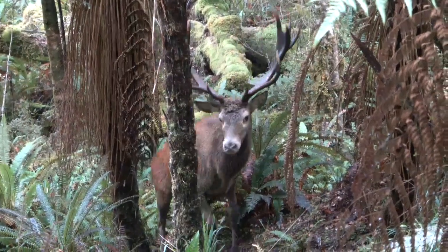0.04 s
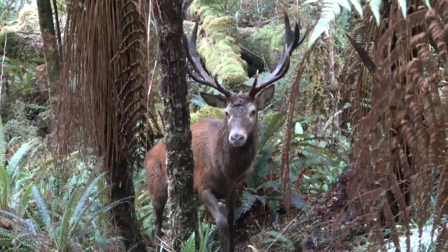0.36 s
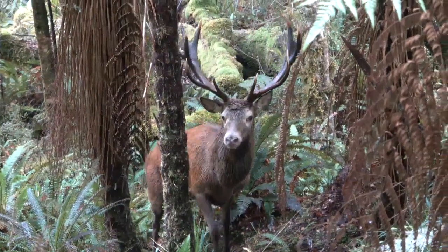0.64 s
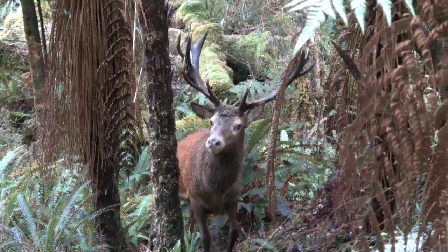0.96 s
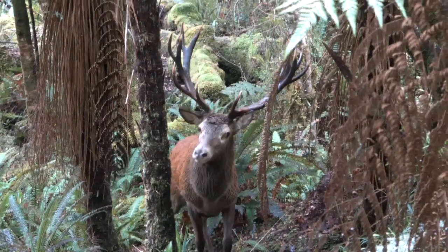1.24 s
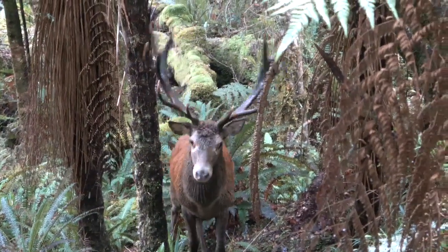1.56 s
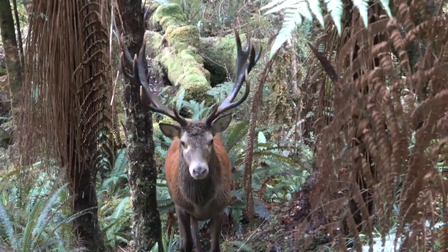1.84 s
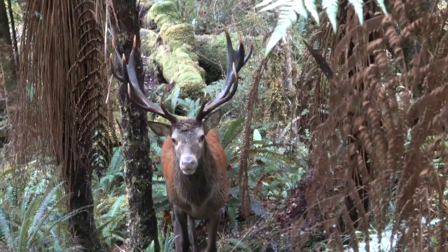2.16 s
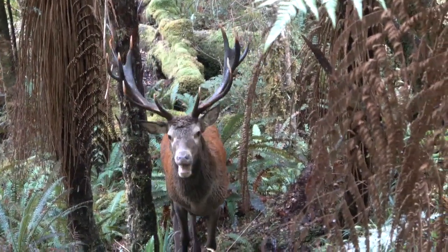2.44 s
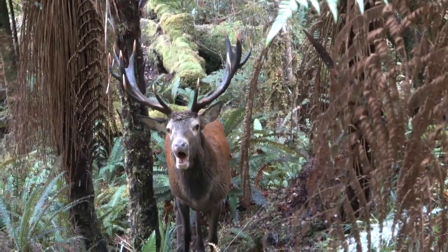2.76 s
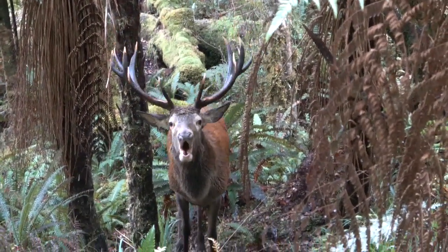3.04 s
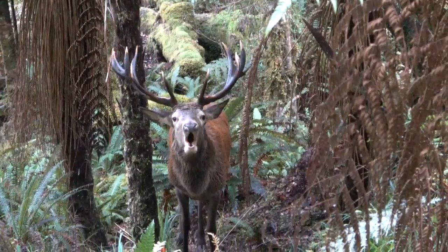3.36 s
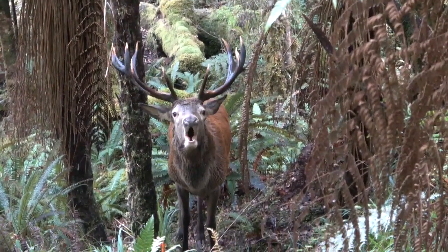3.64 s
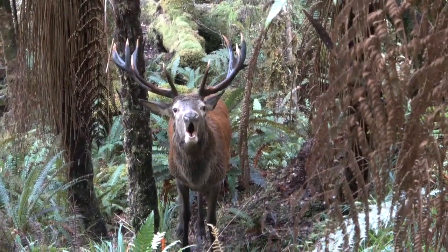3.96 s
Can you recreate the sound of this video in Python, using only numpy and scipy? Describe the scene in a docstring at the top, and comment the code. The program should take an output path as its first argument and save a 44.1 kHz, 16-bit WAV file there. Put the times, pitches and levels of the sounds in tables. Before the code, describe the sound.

A stag gives one loud roar close by, starting as a pulsing growl, holding a hooting note, then breaking lower and rasping. Before it come only faint fern ticks and a brief snort over soft forest hush.

```python
"""A red deer stag roars once, a few metres away in a quiet forest.
Slow pulses of its vocal folds speed up while the throat stretches and its resonances sink.
It holds a loud hoot, one harmonic on a resonance, then breaks to a lower pitch and turns harsh.
Faint fern rustles and a snort, all short puffs of noise, lead in. Nearby trunks reflect
these sounds and the roar, over a soft forest hush that swells toward the end."""
import sys
import numpy as np
from scipy import signal
from scipy.fft import rfft, irfft
from scipy.io import wavfile

SR = 44100
rng = np.random.default_rng(int(sys.argv[2]) if len(sys.argv) > 2 else 0)


def to_wav(s):
    """Save 16-bit WAV."""
    ch = np.atleast_2d(s).T  # columns
    pcm = np.round(np.clip(ch, -1, 1) * 32767)  # PCM
    wavfile.write(sys.argv[1], SR, pcm.astype(np.int16))


N = 176400

# level rides on the roar's three bands (time [s], level [dB])
BASS_LEVEL = [(2.39, -62), (2.456, -52.5), (2.572, -40.5), (2.622, -32), (2.874, -19.5), (2.886, -22),
              (2.964, -13), (3.012, -24.5), (3.116, -18.5), (3.142, -28.5), (3.164, -16), (3.232, -12),
              (3.282, -17), (3.322, -10), (3.372, -9), (3.456, -9), (3.484, -18.5), (3.572, -23),
              (3.802, -22), (3.928, -12), (3.946, -18.5), (4.0, -20.5)]
MIDDLE_LEVEL = [(2.39, -56), (2.474, -44), (2.608, -41.5), (2.618, -29), (2.7, -27.5), (2.8, -24.5),
                (2.886, -21.5), (2.94, -19.5), (3.0, -19), (3.06, -21), (3.125, -28.5), (3.165, -20.5),
                (3.21, -25.5), (3.27, -30), (3.31, -22), (3.35, -30), (3.43, -22.5), (3.466, -29),
                (3.5, -24), (3.62, -21), (3.72, -23), (3.83, -21), (3.93, -23.5), (4, -23.5)]
TREBLE_LEVEL = [(2.39, -67), (2.402, -50.5), (2.586, -46.5), (2.68, -39.5), (2.78, -43), (2.846, -30.5),
                (2.922, -25), (2.964, -31), (3.048, -29.5), (3.124, -39.5), (3.164, -33), (3.286, -47),
                (3.618, -41.5), (3.792, -45.5), (3.842, -38), (4.0, -39.5)]
# stereo lean of the roar (frequency [Hz], left minus right [dB])
ROAR_PAN = [(60, 6), (130, -3), (260, -2.0), (550, -1.5), (1150, -3.5), (2410, -1.5), (5050, 0),
            (10600, 4.5)]


def roar(size=2205):
    """The stag's voice among the trees, each band levelled and then ridden by its own envelope."""
    t, voice, out = np.arange(N) / SR, forest(vocal_folds()), np.zeros((2, N))
    padded = np.pad(voice, ((0, 0), (0, SR // 2)))
    below = lambda hz, edge_hz: 1 / (1 + (hz / edge_hz) ** 16)
    bass = lambda hz: below(hz, 700)
    middle = lambda hz: below(hz, 2800) - below(hz, 700)
    treble = lambda hz: 1 - below(hz, 2800)
    window = np.hanning(size) / np.hanning(size).sum()
    opening = (t > GROWL_RATE[1][0]) & (t < GROWL_RATE[4][0])
    for band, level in ((bass, BASS_LEVEL), (middle, MIDDLE_LEVEL), (treble, TREBLE_LEVEL)):
        part = filtered(padded, band)[:, :N]
        squared = np.pad(part.mean(0) ** 2, size, "reflect")
        power = signal.fftconvolve(squared, window, "same")[size:-size]
        floor = .5 * np.mean(power[opening])  # keeps the silence before the growl down
        out += part * amp(curve(level, t)) / np.sqrt(np.maximum(power, floor))
    return filtered(out, lambda hz: amp(np.outer([.5, -.5], spectrum(ROAR_PAN, hz))))


# the opening growl speeds up (time [s], pulse rate [Hz])
GROWL_RATE = [(2.4, 15), (2.434, 44), (2.45, 49), (2.49, 51), (2.55, 45.5), (2.6, 53), (2.65, 62),
              (2.695, 72), (2.747, 80), (2.795, 87), (2.848, 103), (2.892, 121.8), (2.914, 127.8),
              (2.954, 132.6), (2.994, 147)]
# the held note and its downward break (time [s], pitch [Hz])
HELD_PITCH = [(3.02, 149.9), (3.096, 159.4), (3.202, 161.7), (3.262, 159.1), (3.3, 161.8), (3.402, 164.5),
              (3.448, 161), (3.458, 160.8), (3.492, 139), (3.598, 134.3), (3.666, 136.3), (3.78, 135),
              (3.802, 134.7), (3.944, 118.4), (3.974, 115.4), (4.0, 109.8)]
# rasp in the voice (time [s], noise against pulse at RASP_HZ [ratio])
RASP = [(2.4, 0.15), (2.8, 0.45), (2.92, 0.63), (3.02, 0.65), (3.14, 0.25), (3.42, 0.21), (3.48, 0.81),
        (3.56, 0.23), (3.8, 0.18), (3.87, 0.46), (3.95, 1), (4, 1)]
RASP_HZ, RASP_SLOPE = 2040, 0.92
JITTER, SHIMMER_DB = 0.0054, 2.5  # scatter of pulse timing and strength at full rasp
WANDER, WANDER_HZ = .002, 26  # relative pitch drift and its bandwidth
FLUTTER_DB, FLUTTER_HZ = 2.48, (1.968, 8)  # each resonance wavers in strength


def vocal_folds(size=4096):
    """Each closure of the vocal folds, with a puff of noise, rings the throat."""
    t, hz, out = np.arange(N) / SR, np.fft.rfftfreq(size, 1 / SR), np.zeros(N)
    drift = unit_rms(filtered(rng.standard_normal(N), lambda f: np.exp(-(f / WANDER_HZ) ** 2)))
    pitch = curve(GROWL_RATE + HELD_PITCH, t) * (1 + WANDER * drift)
    cycles = np.cumsum(pitch * (t >= GROWL_RATE[0][0])) / SR
    flutter_rate, flutter_phase = rng.uniform(*FLUTTER_HZ, len(FORMANTS)), rng.random(len(FORMANTS))
    for i in np.flatnonzero(np.diff(np.ceil(cycles))):
        s, rasp = t[i], curve(RASP, t[i])
        late, strong = rng.standard_normal(2)
        puff = rng.standard_normal(size) * np.exp(-t[:size] / 0.0072)
        noise_gain = rasp * (hz / RASP_HZ) ** RASP_SLOPE
        source = 1 + noise_gain * rfft(puff / np.linalg.norm(puff))
        flutter_db = FLUTTER_DB * np.sin(2 * np.pi * (flutter_rate * s + flutter_phase))
        colour = minimum_phase(throat(s, hz, flutter_db) / np.sqrt(1 + noise_gain ** 2))
        onset = s + JITTER * rasp * late / max(pitch[i], 100)
        add(out, onset, -amp(SHIMMER_DB * rasp * strong) * irfft(source * colour))
    return out


# throat resonances (at rest [Hz], half stretched [Hz], fully stretched [Hz], width [Hz],
# growl gain [dB], hoot gain [dB], bellow gain [dB])
FORMANTS = [(293, 205, 177.7, 31, -2.5, -7, -8), (335, 390, 252, 22, -27, -1, -16),
            (402, 448, 377, 40.6, 4, 0.5, 3.5), (921, 578, 480.7, 38, 4.5, 1, 13),
            (880, 816, 810, 26, -13, 3, 11.5), (1164, 1017, 910, 56, -1, -7.5, -13),
            (1260, 1150, 1143, 41.6, -14, 1.5, 1.5), (1460, 1374, 1263, 53.5, 1.5, -18, -17.5),
            (1500, 1700, 1453, 126, -11.5, -13, -12), (1815, 1850, 1915, 36.3, -1, 3.5, -13),
            (2280, 1977, 2240, 140, -6.5, -17, -13), (2700, 2740, 2490, 150, -18, -22.5, -21.5),
            (3240, 3220, 3330, 62, -18.5, -22.5, -1.5), (3950, 3984, 3760, 103, -15.5, -19.5, -21),
            (4070, 4810, 3480, 200, -15.5, -27, -30), (5520, 6400, 5260, 250, -36.5, -31, -20),
            (6450, 4900, 6220, 80, -27, -23, -38.5), (8000, 6900, 7220, 940, -36.5, -44, -29),
            (9550, 10200, 8740, 900, -46.5, -50, -63)]
# hollows between the resonances (at rest [Hz], fully stretched [Hz], width [Hz], depth [dB])
NOTCHES = [(1570, 1696, 104, 8), (3050, 1000, 68, 2), (5270, 4760, 106, 29), (6100, 5760, 72, 18)]
# the throat lengthens (time [s], stretch [0 at rest, 1 full])
THROAT_STRETCH = [(2.5, 0.29), (2.58, 0.089), (2.62, 0.26), (2.7, 0.43), (2.8, .54), (2.9, 0.67),
                  (2.96, 0.86), (3.12, 0.92)]
# morph between the formant gains (time [s], voice [0 growl, 1 hoot, 2 bellow])
VOICE_MORPH = [(2.85, 0), (2.96, 0.23), (3.02, 0.12), (3.13, 0.73), (3.45, 1), (3.5, 1.42)]
# the resonance that lifts one harmonic into a hoot (time [s], boost at full morph [dB])
HOOT_BOOST = [(3.05, 6.5), (3.13, -6), (3.2, 10), (3.28, 5), (3.33, 9.5), (3.39, 14), (3.45, 13.5),
              (3.485, 14.5), (3.55, 5), (3.85, 3), (3.92, 4.5), (3.96, 1.5)]
HOOT_HZ, HOOT_WIDTH_HZ = 486.3, 39
VALLEY_DB, LOW_CUT_HZ = -66.5, 112


def throat(s, hz, flutter_db):
    """Gain of the throat at time s: stretching slides its resonances, most of them downward."""
    stretch, morph = curve(THROAT_STRETCH, s), curve(VOICE_MORPH, s)
    power = amp(VALLEY_DB) ** 2
    for (rest, half, full, width, *gains_db), sway_db in zip(FORMANTS, flutter_db):
        centre = np.interp(stretch, [0, .5, 1], [rest, half, full])
        peak = amp(np.interp(morph, [0, 1, 2], gains_db) + sway_db)
        power = power + peak ** 2 / (1 + ((hz - centre) / width) ** 2) ** 2
    bump = lambda centre, width: np.exp(-((hz - centre) / width) ** 2)
    notch_db = sum(depth * bump(rest + stretch * (full - rest), width)
                   for rest, full, width, depth in NOTCHES)
    hoot = bump(HOOT_HZ, HOOT_WIDTH_HZ)
    neighbours = bump(HOOT_HZ, 220) - hoot  # harmonics beside the hoot duck as it rises
    hoot_db = curve(HOOT_BOOST, s) * np.clip(morph, 0, 1) * (hoot - .9 * neighbours)
    low_cut = (hz ** 2 + 100) / (hz ** 2 + LOW_CUT_HZ ** 2)
    return np.sqrt(power) * amp(hoot_db - notch_db) * low_cut


# tone of the snort (frequency [Hz], relative level [dB])
SNORT_EQ = [(88, -54), (150, -34), (418, -0.5), (873, -1), (1320, -12), (1960, -8), (2430, -29),
            (2610, -15), (4240, -27), (6650, -24), (11000, -42), (14300, -76), (22000, -120)]


def snort(start_s=2.308, level_db=-40, length_s=.022):
    """One short puff of breath just before the roar."""
    out = np.zeros(N)
    add(out, start_s, amp(level_db) * burst(length_s, lambda hz: amp(spectrum(SNORT_EQ, hz))))
    return out


# fern rustles and twig ticks (time [s], level [dB], length [s], centre [Hz], width [octaves])
FERN_HITS = [(0.478, -62.5, .05, 4500, 0.89), (0.714, -66, .008, 7000, .6), (.887, -52, 0.005, 6270, 0.33),
             (1.44, -65.5, 0.027, 7000, .4), (2.031, -64, 0.0092, 8400, 0.18),
             (2.14, -53.5, 0.012, 1100, 0.85)]


def ferns():
    """Ferns and twigs brush as the stag steps forward."""
    out = np.zeros(N)
    for s, db, length, centre_hz, octaves in FERN_HITS:
        band = lambda hz: np.exp(-.5 * (np.log2((hz + 1) / centre_hz) / octaves) ** 2)
        add(out, s, amp(db) * burst(length, band))
    return out


# reverb tail of the forest (frequency [Hz], time to fall 60 dB [s])
FOREST_DECAY = [(150, 0.31), (600, 0.98), (2000, 1), (8000, 0.75)]
TAIL_DB, TRUNKS_DB = -16.5, -7


def forest(x):
    """Adds quick reflections from nearby trunks and a faint tail, different at each ear."""
    t = np.arange(SR // 2) / SR
    hz, frame_s, frames = signal.stft(rng.standard_normal((2, len(t))), SR, nperseg=256)
    decay = amp(-60 * frame_s / spectrum(FOREST_DECAY, hz)[:, None])
    tail = signal.istft(frames * decay, SR)[1][:, :len(t)]
    scatter = rng.standard_normal((3, len(t))) * np.exp(-t / .006) * (t > .002)  # left, right, shared
    # near reflections are kept to the treble, so the low harmonics stay clear and steady
    highpass = signal.butter(2, 2200, "high", fs=SR, output="sos")
    trunks = signal.sosfilt(highpass, scatter[:2] * 0.75 + scatter[2])
    echo = amp(TAIL_DB) * tail / np.linalg.norm(tail[0])
    echo += amp(TRUNKS_DB) * trunks / np.linalg.norm(trunks[0])
    return x + signal.fftconvolve(x[None], echo, axes=1)[:, :N]


# tone of the forest bed (frequency [Hz], relative level [dB])
HUSH_EQ = [(12, -46), (20, -16), (71, -9), (137, -12), (189, -5), (259, -11), (375, -2), (587, -4),
           (688, 0), (1110, -11), (1330, -12), (6660, -27), (11000, -33), (14300, -63), (22000, -120)]
# its slow swell (time [s], level [dB])
HUSH_SWELL = [(0, -51), (.6, -51.5), (1.3, -52.5), (2, -52.5), (4, -41.5)]
# its stereo image (frequency [Hz], likeness of left and right [0-1])
HUSH_COHERENCE = [(60, 0.54), (170, 0.8), (470, 0.9), (1330, 0.92), (3750, 0.85), (10600, 0.57)]


def hush():
    """Distant wash of the forest, swaying a little and rising under the roar."""
    shared, separate = rng.standard_normal((2, N))
    likeness = lambda hz: spectrum(HUSH_COHERENCE, hz)
    right = filtered(shared, likeness) + filtered(separate, lambda hz: np.sqrt(1 - likeness(hz) ** 2))
    bed = unit_rms(filtered(np.array([shared, right]), lambda hz: amp(spectrum(HUSH_EQ, hz))))
    t = np.arange(N) / SR
    sway = sum(np.sin(2 * np.pi * (hz * t + rng.random())) for hz in np.geomspace(1, 14, num=16))
    return bed * amp(curve(HUSH_SWELL, t) + 0.45 * unit_rms(sway))


def burst(length_s, colour, size=8192):
    """A puff of coloured noise: quick rise, hold, quick fall."""
    t = np.arange(size) / SR
    envelope = np.minimum(t / 0.00067, 1) * np.exp(-(t / length_s) ** 3)
    return unit_rms(filtered(rng.standard_normal(size), colour)) * envelope


def amp(db):
    """Decibels to gain."""
    return 10 ** (np.asarray(db) / 20)


def unit_rms(x):
    """Scales to an rms of one."""
    return x / np.sqrt(np.mean(x ** 2) + 1e-20)


def curve(points, t):
    """Reads an envelope at times t."""
    return np.interp(t, *np.transpose(points))


def spectrum(points, hz):
    """Reads a table on a log-frequency axis."""
    f, value = np.transpose(points)
    return np.interp(np.log(hz + 1), np.log(f + 1), value)


def add(mix, s, sound):
    """Mixes a sound in at time s."""
    part = mix[round(s * SR):][:len(sound)]
    part += sound[:len(part)]


def filtered(x, gain):
    """Filters by a gain that is a function of frequency."""
    return irfft(rfft(x) * gain(np.fft.rfftfreq(x.shape[-1], 1 / SR)), x.shape[-1])


def minimum_phase(gain):
    """Spectrum with the given gain that rings only after it is struck."""
    log_gain = np.log(np.concatenate([gain, gain[-2:0:-1]]))
    return np.exp(np.conj(signal.hilbert(log_gain)))[:len(gain)]


def scene():
    """The stag up front, the forest bed behind, small sounds leading in."""
    return roar() + hush() + forest(ferns() + snort())


def record(dry, cutoff_hz=11150):
    """A steep low-pass takes off the top octave."""
    lowpass = signal.firwin(801, cutoff_hz, window=("kaiser", 9), fs=SR)
    return signal.oaconvolve(dry, lowpass[None], "same")


dry = scene()
out = record(dry)
to_wav(out)
```